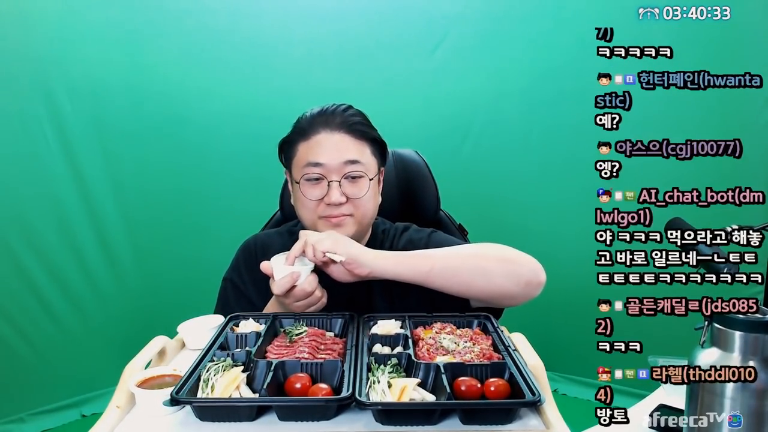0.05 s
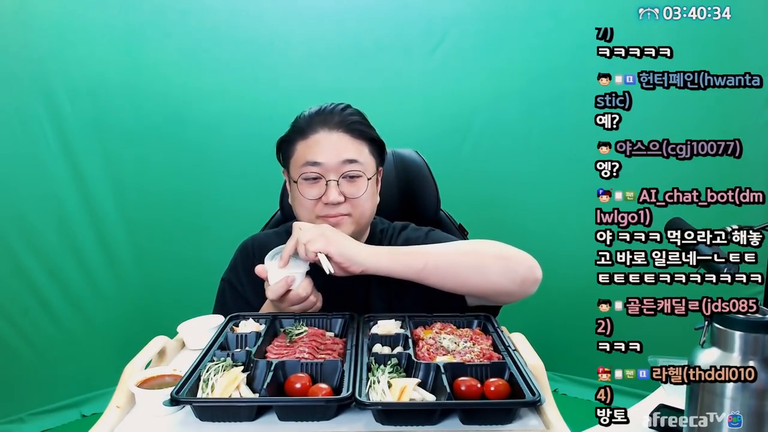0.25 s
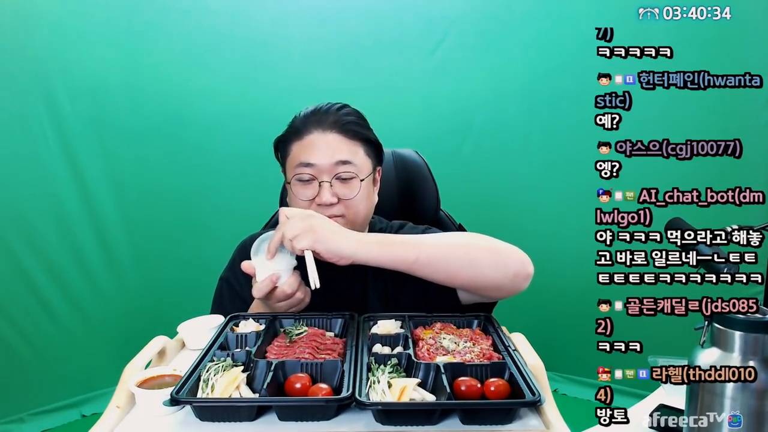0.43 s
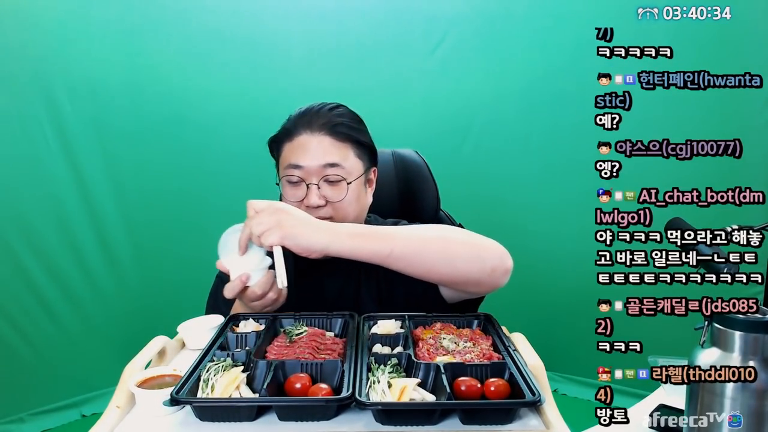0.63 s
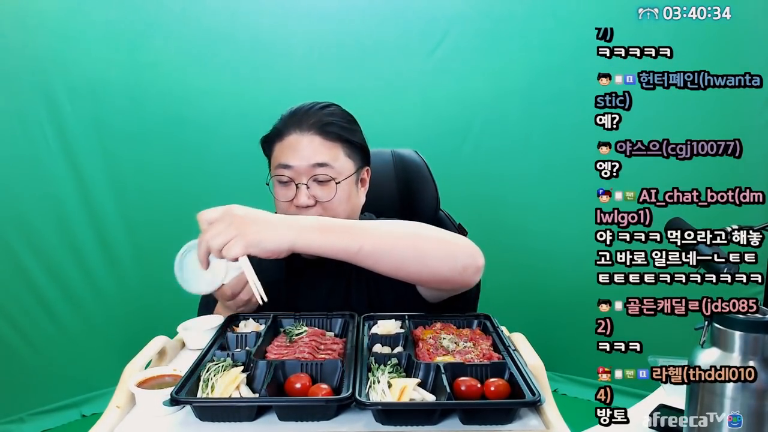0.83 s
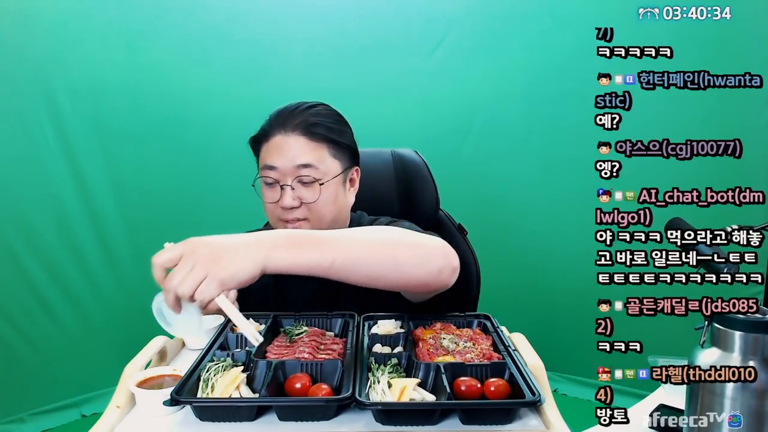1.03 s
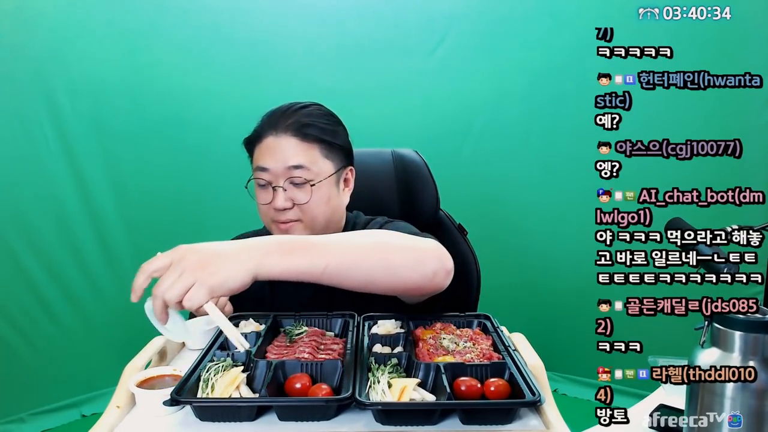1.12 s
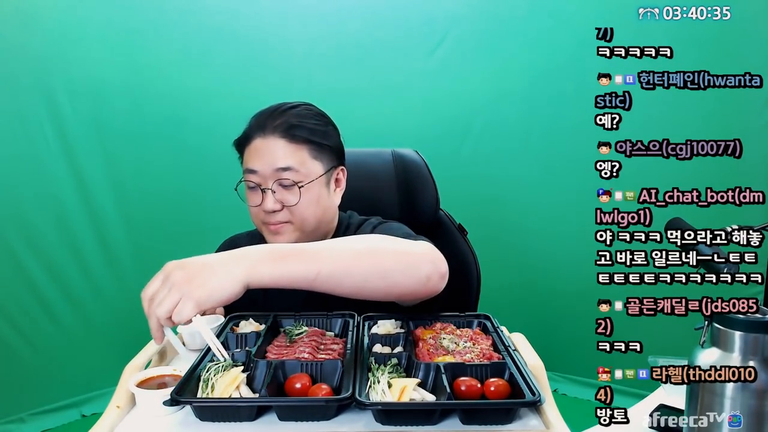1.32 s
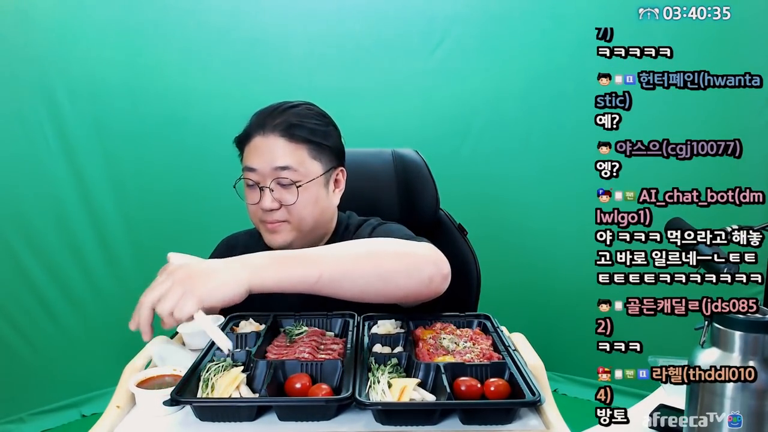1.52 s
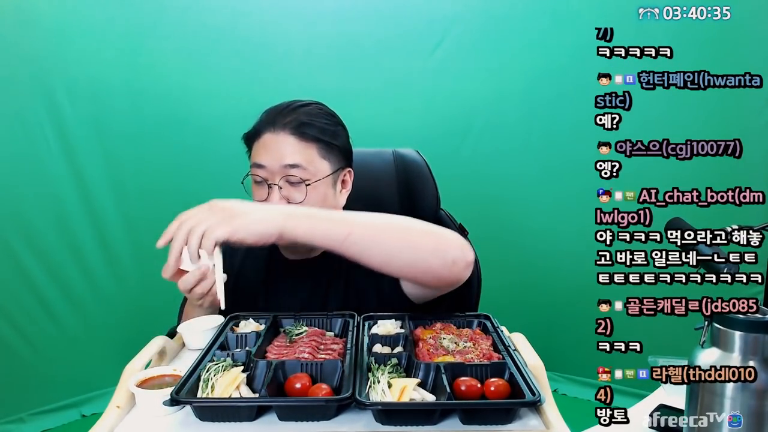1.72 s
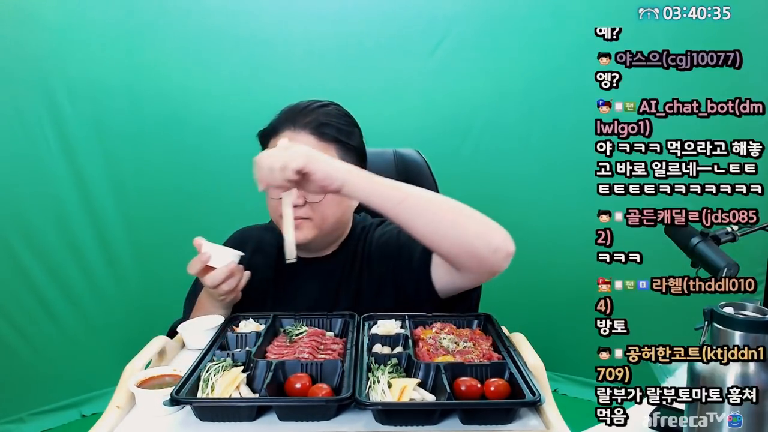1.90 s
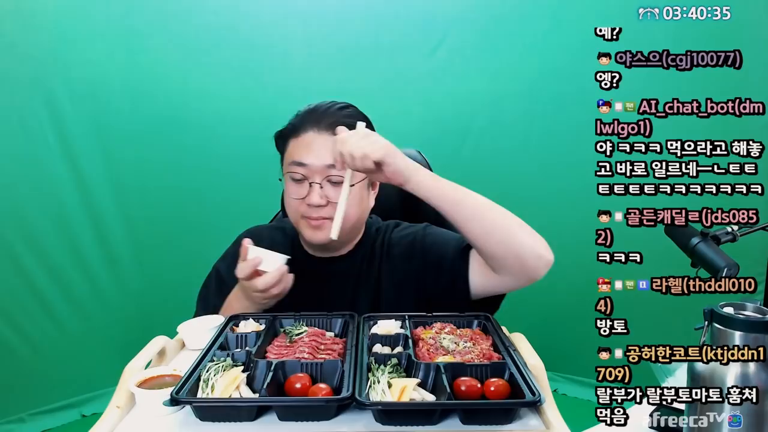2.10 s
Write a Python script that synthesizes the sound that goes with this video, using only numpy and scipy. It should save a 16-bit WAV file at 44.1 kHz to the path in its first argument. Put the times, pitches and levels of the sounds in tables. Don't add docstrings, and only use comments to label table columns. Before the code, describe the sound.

Chopsticks knock on a thin plastic cup, close in a small room with low steady hum. Light scratching and a tap open, then the loudest sharp cracks burst at 0.24-0.3 s. Scraping and hollow taps return at 0.55-0.7, a small click at 0.9. Soft finger rubbing until 1.57, then dull tray bumps and a stick knock to 1.7, and rapid clacks at 1.8-1.9.

```python
import sys
import numpy as np
from scipy import signal
from scipy.fft import rfft, irfft
from scipy.io import wavfile
from scipy.ndimage import uniform_filter1d

SR = 44100
rng = np.random.default_rng(int(sys.argv[2]) if len(sys.argv) > 2 else 0)


def linear_from_db(decibels):
    return 10 ** (np.asarray(decibels, float) / 20)


def dump(signal):
    limited = np.clip(np.atleast_2d(signal).T, -1, 1)
    pcm = np.round(limited * 32767).astype(np.int16)
    wavfile.write(sys.argv[1], SR, pcm)


N = 94815

# pitch in Hz, level in dB, time to fade by 60 dB in seconds.
CUP_MODES = [(412, 4.5, 0.058), (756.4, -5, 0.026), (862, -6.5, 0.02), (955.5, -2, 0.037),
             (1499, -2, 0.023), (2200, 0.5, 0.012), (3300, 5, 0.0038)]
# pitch in Hz, level in dB, time to fade by 60 dB in seconds.
STICK_MODES = [(750, -4, 0.012), (1824, 1, 0.015), (2900, -18.5, .012), (3890, 0, 0.02),
               (4600, -12, 0.0097), (3550, -15, 0.018), (6400, 0, 0.021)]
# frequency in Hz, level in dB.
CRACK_COLOUR = [(1180, -33.5), (2000, -15), (3430, -5), (4450, -9), (6590, -5), (9250, -2), (15300, -9.5),
                (16000, -31)]
# share of the crack at its own pitch from 0 to 1,
# crack fade time in seconds, crack width in Hz, loss of far-off ring pitches in dB per octave.
DULL_CRACK = (.3, .014, 3600, 11)


def evened(x):
    return x / np.sqrt(np.mean(x ** 2) + 1e-20)


def read(points, hz):
    f, value = np.transpose(points)
    return np.interp(np.log(hz + 1), np.log(f + 1), value)


def bells(rows, hz):
    return sum(db / (1 + (2 * (hz - f) / width) ** 2) for f, width, db in rows)


def colour(x, points, extra=()):
    hz = np.fft.rfftfreq(x.shape[-1], 1 / SR)
    gain = linear_from_db(read(points, hz) + bells(extra, hz))
    return irfft(rfft(x) * gain, x.shape[-1])


def resonate(x, hz, width):
    turn = np.exp(2j * np.pi * np.cumsum(hz * np.ones(len(x))) / SR)
    r = np.exp(-np.pi * width / SR)
    smooth = signal.lfilter([1 - r], [1, -r], x / turn + 1e-18)
    return 2 * (turn * smooth).real


def add(mix, s, sound):
    part = mix[round(s * SR):][:len(sound)]
    part += sound[:len(part)]


def curve(points):
    s, db = np.transpose(points)
    return linear_from_db(np.interp(np.arange(N) / SR, s, db, left=-120, right=-120))


def grit(per_s, size_db):
    size = linear_from_db(size_db * np.minimum(rng.exponential(1, N), 4))
    happens = rng.random(N) < per_s / SR
    return evened(rng.standard_normal(N) * size * happens)


def crack(t, pitch_hz, share, fade, width_hz):
    burst = rfft(rng.standard_normal(len(t)) * linear_from_db(-60 * t / fade))
    burst = irfft(burst / np.sqrt(uniform_filter1d(abs(burst) ** 2, size=40)))
    peak = burst
    for _ in range(3):
        peak = resonate(peak, pitch_hz, width_hz)
    sound = (1 - share) * evened(colour(burst, CRACK_COLOUR)) + share * evened(peak)
    sound = sound * linear_from_db(-20 * t / fade) * (1 - np.exp(-t / 0.0001))
    return sound / abs(sound).max()


def ring(t, modes, favoured_hz, focus_db, rattle):
    hz, db, t60 = np.transpose(modes)[:, :, None]
    spread_db = 1.0 * rng.standard_normal(hz.shape)
    detune = 1 + 0.01 * rng.standard_normal(hz.shape)
    far_db = focus_db * abs(np.log2(hz / favoured_hz))
    gain = linear_from_db(db + spread_db - far_db - 60 * t / t60)
    sound = (gain * np.sin(2 * np.pi * hz * detune * t)).sum(0)
    shake = evened(uniform_filter1d(rng.standard_normal(len(t)), size=60))
    return sound * (1 + rattle * shake) * np.minimum(t / 0.0011, 1)


def contacts(rows, modes, share, fade, width_hz, focus_db, rattle):
    out = np.zeros((2, N))
    t = np.arange(4096) / SR
    for s, crack_db, crack_hz, ring_db, ring_hz in rows:
        add(out[0], s, linear_from_db(crack_db) * crack(t, crack_hz, share, fade, width_hz))
        add(out[1], s, linear_from_db(ring_db) * ring(t, modes, ring_hz, focus_db, rattle))
    return out


def hum():
    # frequency in Hz, level in dB.
    hum_colour = [(15, -43.5), (25, -17.5), (141, -1), (317, -11.5), (405, -8), (451, -9.5), (516, -7.5),
                  (8360, -42), (16000, -44)]
    # centre in Hz, width in Hz, height in dB.
    hum_bumps = [(63.6, 4.6, 12), (130, 25, 1.5), (248, 75, 7), (442, 660, 1.5), (8800, 8600, 28.5),
                 (1500, 590, 4), (12800, 2100, 10), (14900, 1300, 12)]
    return linear_from_db(-56) * evened(colour(rng.standard_normal(N), hum_colour, hum_bumps))


def scrape():
    # time in seconds, level in dB.
    drag = [
        (0, -45),
        (.1, -59.5),
        (.17, -56.5),
        (.23, -42.5),
        (.3, -80),
        (.5, -61),
        (.56, -56),
        (.62, -59),
        (.66, -49.5),
        (.76, -77),
    ]
    slips = grit(per_s=2000, size_db=3.0)
    wall = np.zeros(N)
    for hz, db, t60 in CUP_MODES:
        mode = resonate(resonate(slips, hz, 4 / t60), hz, 460)
        far_db = 14.0 * abs(np.log2(hz / 1060))
        wall += linear_from_db(db - far_db) * evened(mode)
    return curve(drag) * (evened(wall) + linear_from_db(-7) * evened(colour(slips, CRACK_COLOUR)))


def tip_slips():
    # start in seconds, level in dB.
    slip_times = [(.001,-33), (0.012,-40), (0.025,-33.5), (.055,-38), (0.06,-44), (0.067,-32),
                  (0.075,-31.5), (0.088,-34), (.102,-44), (.156,-34), (.166,-32.5), (0.203,-35), (.209,-32),
                  (.217,-31), (.226,-33), (0.231,-34), (0.546,-38), (.558,-38), (.566,-48), (0.577,-40),
                  (.639,-37), (0.644,-32), (0.653,-33), (0.66,-42), (0.668,-41), (.675,-40)]
    rows = [(s, db - 8, 3300, db - 4.5, 1200) for s, db in slip_times]
    return contacts(rows, CUP_MODES, *DULL_CRACK, rattle=0.29)


def tip_ticks():
    # start in seconds, crack level in dB, crack pitch in Hz.
    tick_times = [(.002, -34, 8300), (0.014, -40, 11300), (.049, -31, 7960), (.101, -36.5, 8400),
                  (.157, -40, 6440), (.167, -46, 7400), (.209, -42, 7900), (0.216, -52, 8440),
                  (0.2317, -40.5, 7910), (.425, -39, 11800), (0.547, -44, 9500), (.557, -46, 9800),
                  (.577, -62, 9800), (0.92, -42, 8900), (1.163, -48, 9140), (1.328, -45.5, 10000),
                  (1.623, -39, 10000)]
    # share of crack at its pitch from 0 to 1, crack fade in seconds, crack width in Hz,
    # loss of far-off ring pitches in dB per octave.
    tick_crack = (.28, .016, 3000, 14)
    rows = [(s, db, hz, db - 15.5, 1400) for s, db, hz in tick_times]
    return contacts(rows, CUP_MODES, *tick_crack, rattle=0.54)


def cup_knocks():
    # start in seconds, crack level in dB, crack pitch in Hz, ring level in dB, favoured ring in Hz.
    knocks = [(.024, -31, 7950, -64, 1400), (.038, -20.5, 8500, -55, 1300), (.0404, -13, 8160, -20.5, 816),
              (.130, -24.5, 9400, -27.5, 1140), (.148, -27, 6670, -34, 2200), (.2392, 1.5, 8900, -15, 1400),
              (.241, -13.5, 6040, -20, 970), (.259, -2.5, 8500, -12.5, 2200),
              (.2634, 3.5, 10870, -14, 3300), (.2812, 2.5, 9760, -7, 1350), (.304, -11, 7800, -14.5, 1450),
              (.589, -47, 9800, -29.5, 1230), (.6065, -25.5, 9330, -38, 1100),
              (.6195, -7.5, 8630, -21, 970), (.6912, -18, 12850, -31, 900),
              (1.574, -17.5, 10600, -34, 1000), (1.607, -25, 12000, -39, 1000)]
    # share of crack at its pitch from 0 to 1, crack fade in seconds, crack width in Hz,
    # loss of far-off ring pitches in dB per octave.
    knock_crack = (0.35, .011, 3200, 15)
    return contacts(knocks, CUP_MODES, *knock_crack, rattle=0.5)


def dry_clicks():
    # start in seconds, crack level in dB, crack pitch in Hz, ring level in dB, favoured ring in Hz.
    click_rows = [(.2394, -4.5, 6200, -43, 3500), (.248, -15, 7260, -40, 3550), (.259, 0, 8100, -24, 6400),
                  (.2636, -3.5, 7040, -32, 6400), (.273, -26, 7000, -40, 3550),
                  (.2816, -5, 7160, -28, 3550), (.304, -13, 6740, -40, 6400), (.6913, -19, 7050, -25, 4100),
                  (.735, -38.5, 13000, -68, 4000), (.757, -45, 13000, -58, 4000),
                  (.8936, -24.5, 9950, -41, 6570), (.0405, -28.5, 4700, -41, 4600),
                  (.9276, -40, 10900, -41.5, 3650), (1.5746, -34, 3100, -31, 2900),
                  (1.607, -41, 3400, -40, 3950), (1.7236, -21.5, 11100, -35, 3200),
                  (1.7255, -31.5, 3200, -53, 3550), (1.7296, -21, 8500, -54, 3550)]
    # share of crack at its pitch from 0 to 1, crack fade in seconds, crack width in Hz,
    # loss of far-off ring pitches in dB per octave.
    click_crack = (0.92, 0.013, 2570, 21)
    return contacts(click_rows, STICK_MODES, *click_crack, rattle=0.53)


def rub():
    # middle in seconds, half length in seconds, level in dB.
    strokes = [(0.198, 0.019, -80), (0.5, 0.026, -56.5), (0.655, 0.028, -48), (0.752, 0.025, -46.5),
               (0.95, 0.032, -62), (1.085, 0.015, -49), (1.158, 0.046, -49.5), (1.165, 0.0045, -43.5),
               (1.371, 0.058, -57.5), (1.513, 0.029, -55), (1.678, 0.081, -51.5)]
    # frequency in Hz, level in dB.
    hiss_colour = [(1470, -55.5), (2500, -19.5), (3260, -24), (4440, -18.5), (4910, -18), (9010, -1.5),
                   (12800, -12), (16000, -18)]
    t = np.arange(N) / SR
    swells = sum(linear_from_db(db) * np.exp(-((t - s) / half) ** 2) for s, half, db in strokes)
    return swells * evened(colour(grit(per_s=4700, size_db=1.0), hiss_colour))


def squeaks():
    # start in seconds, length in seconds, first pitch in Hz, last pitch in Hz, level in dB.
    whistles = [
        (.5, .035, 11300, 12000, -67),
        (.53, .085, 12400, 13300, -65),
        (.72, .06, 12300, 12800, -67),
        (.78, .11, 12850, 12100, -63),
        (.83, .045, 11600, 11250, -65),
        (.83, .05, 14300, 13700, -68),
    ]
    out = np.zeros(N)
    for s, length, first_hz, last_hz, db in whistles:
        u = np.linspace(0, 1, round(length * SR))
        waver = evened(uniform_filter1d(rng.standard_normal((2, 8192)), size=200))[:, :len(u)]
        pitch = first_hz + (last_hz - first_hz) * u ** 3 + 50 * waver[0]
        turns = np.cumsum(pitch) / SR
        swell = np.sqrt(np.sin(np.pi * u) + 1e-9)
        add(out, s, linear_from_db(db + 2.5 * waver[1]) * swell * np.sin(2 * np.pi * turns))
    return out


def desk_thuds():
    # start in seconds, level in dB, favoured ring in Hz.
    bumps = [
        (1.576, -30.5, 457),
        (1.589, -46, 700),
        (1.607, -35, 600),
        (1.624, -38.5, 750),
        (1.634, -47, 600),
        (1.644, -35, 600),
        (1.655, -56, 504),
        (1.668, -42.5, 455),
        (1.680, -36, 450),
        (1.781, -44, 430),
    ]
    # pitch in Hz, level in dB, time to fade by 60 dB in seconds.
    desk_modes = [(409, -1, 0.055), (479, -11, .03), (594, -3, 0.023), (710, -4.5, 0.036),
                  (1000, -4, 0.037)]
    rows = [(s, db - 30, 2000, db, hz) for s, db, hz in bumps]
    return contacts(rows, desk_modes, *DULL_CRACK, rattle=0.81)


def stick_knocks():
    # start in seconds, crack level in dB, crack pitch in Hz, ring level in dB, favoured ring in Hz.
    knocks = [
        (1.6415, -12, 9800, -18, 3880),
        (1.6705, -23, 8800, -28, 3900),
        (1.683, -27.5, 7200, -48, 3500),
    ]
    # share of crack at its pitch from 0 to 1, crack fade in seconds, crack width in Hz,
    # loss of far-off ring pitches in dB per octave.
    knock_crack = (0.39, 0.0236, 4500, 5.9)
    return contacts(knocks, STICK_MODES, *knock_crack, rattle=0.4)


def stick_clacks():
    # start in seconds, crack level in dB, crack pitch in Hz, ring level in dB, favoured ring in Hz.
    clack_rows = [(1.760, -34, 9130, -41, 1350), (1.780, -32, 10340, -36, 4200),
                  (1.801, -32.5, 8900, -37, 2520), (1.807, -13.5, 8700, -18.5, 2900),
                  (1.8142, -12.5, 6800, -12.5, 4300), (1.822, -15.5, 6700, -23, 2180),
                  (1.8225, -35, 5160, -27, 4330), (1.832, -36, 6480, -35, 6200),
                  (1.840, -39, 7000, -45, 1700), (1.855, -40, 6200, -41, 4300),
                  (1.8685, -27, 6870, -28.5, 1900), (1.869, -46, 6900, -38, 4320),
                  (1.8795, -16.5, 7630, -17.5, 3400), (1.894, -33.5, 5500, -31, 2015),
                  (1.899, -34, 6200, -39, 2500)]
    # pitch in Hz, level in dB, time to fade by 60 dB in seconds.
    gripped_modes = [(937, 2.5, 0.019), (1350, -1, 0.027), (1726, 0.5, 0.024), (2180, 3.5, 0.0088),
                     (2540, -7, 0.022), (3800, -15, 0.011), (4302, 1, .015), (4553, -6.5, 0.015),
                     (6200, -10.5, .012), (6850, 0, 0.015)]
    # share of crack at its pitch from 0 to 1, crack fade in seconds, crack width in Hz,
    # loss of far-off ring pitches in dB per octave.
    clack_crack = (0.37, 0.018, 3300, 10.9)
    return contacts(clack_rows, gripped_modes, *clack_crack, rattle=0.4)


def room(x):
    # frequency in Hz, time to fade by 60 dB in seconds.
    fade_times = [(300, 0.048), (800, 0.22), (2000, 0.32), (5500, 0.31), (14000, 0.28)]
    # frequency in Hz, level in dB.
    tint = [(300, 0.5), (900, 10), (1500, 14), (2500, 9), (3500, 4), (5000, 6.5), (8000, 0.5), (15000, -1)]
    # centre in Hz, width in Hz, height in dB.
    lingering = [(1492, 420, 2), (3400, 400, 3.5), (6700, 540, 4.5), (8050, 500, 5)]
    # delay in seconds, level in dB.
    echoes = [
        (.0022, -20),
        (.0045, -12.5),
        (.009, -30),
    ]
    tail = np.zeros(SR // 2)
    at = np.arange(200, len(tail) - 12, 12)
    tail[at + rng.integers(0, 12, len(at))] = rng.choice([-1., 1.], len(at))
    hz, t, z = signal.stft(tail, SR, nperseg=256)
    start_db = read(tint, hz) + bells(lingering, hz)
    fall_db = 60 * t / read(fade_times, hz)[:, None]
    tail = signal.istft(z * linear_from_db(start_db[:, None] - fall_db), SR, nperseg=256)[1]
    tail = linear_from_db(-10.5) * tail / np.linalg.norm(tail)
    for s, db in echoes:
        add(tail, s, linear_from_db(db) * np.ones(1))
    return signal.fftconvolve(x, tail)[:N]


def scene():
    near = tip_slips() + tip_ticks() + cup_knocks() + dry_clicks()
    near = near + desk_thuds() + stick_knocks() + stick_clacks()
    near[1] += scrape()
    bass_cut = signal.butter(2, 266, "high", fs=SR)
    cracks, rings = signal.lfilter(*bass_cut, near)
    to_room = cracks + linear_from_db(-7.5) * rings
    return (cracks + rings + room(to_room) + rub() + squeaks() + hum())[None]


def top_cut(x):
    return signal.sosfilt(signal.butter(12, 16460, fs=SR, output="sos"), x)


def record(dry):
    # frequency in Hz, level in dB.
    mic_colour = [(20, -18), (60, 5), (15400, -0.5), (15650, -15), (16400, -23), (16800, -55)]
    # centre in Hz, width in Hz, depth in dB.
    mic_dips = [(330, 18, -12.5), (631, 43, -18), (1168, 90, -10.5), (5240, 690, -0.5), (10540, 1500, -1),
                (2650, 310, -2.5)]
    hz = abs(np.fft.fftfreq(8192, 1 / SR))
    log_gain = np.log(linear_from_db(read(mic_colour, hz) + bells(mic_dips, hz)))
    response = np.fft.ifft(np.exp(np.conj(signal.hilbert(log_gain)))).real
    x = signal.fftconvolve(dry, response[None])[:, :N]
    ceiling = linear_from_db(2)
    return top_cut(ceiling * np.tanh(x / ceiling))


dry = scene()
out = record(dry)
dump(out)
```